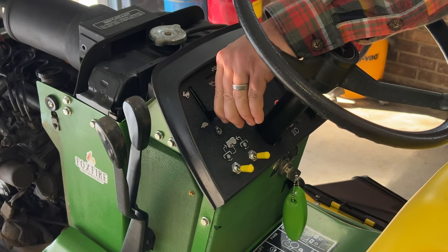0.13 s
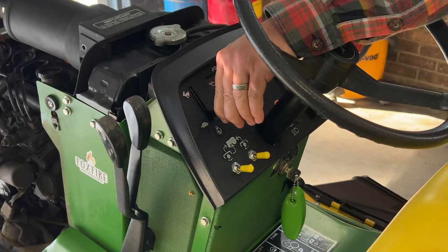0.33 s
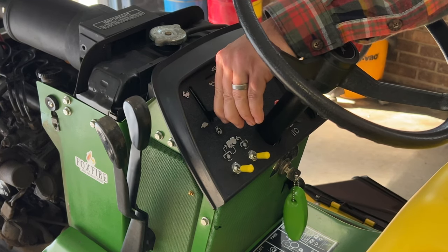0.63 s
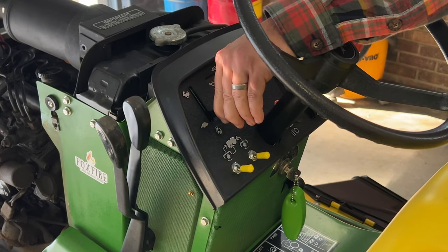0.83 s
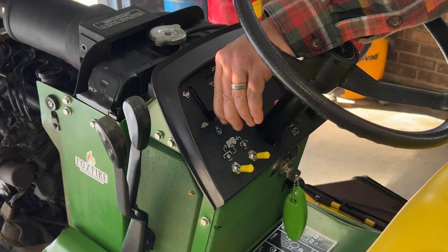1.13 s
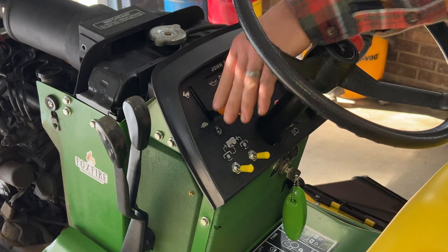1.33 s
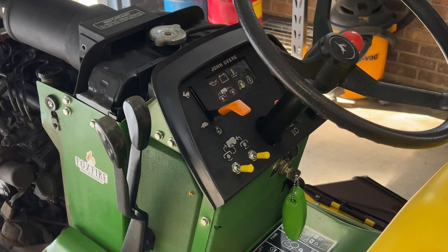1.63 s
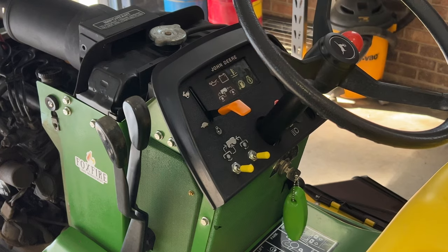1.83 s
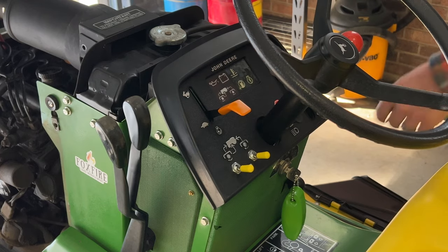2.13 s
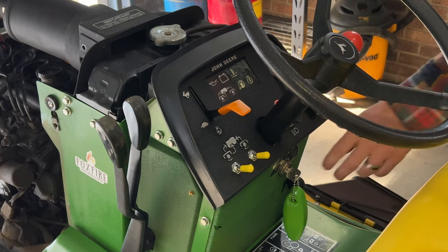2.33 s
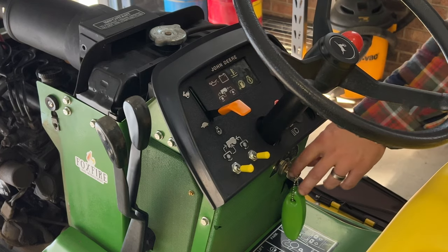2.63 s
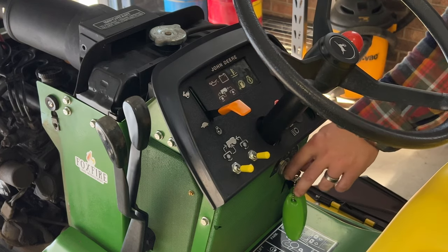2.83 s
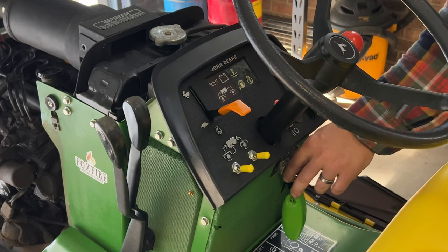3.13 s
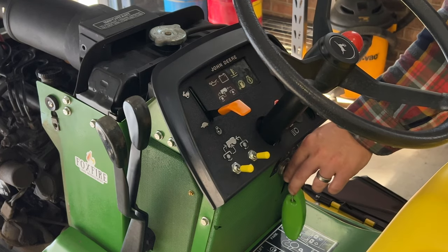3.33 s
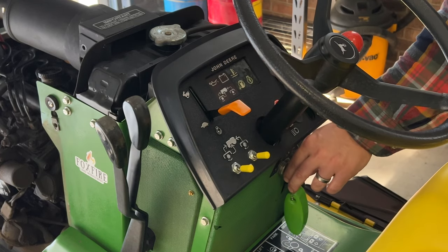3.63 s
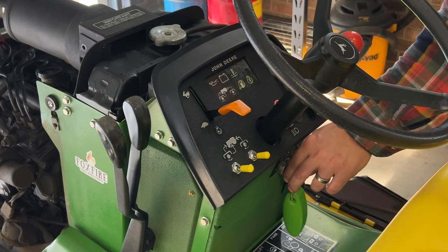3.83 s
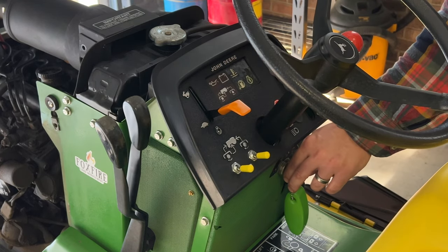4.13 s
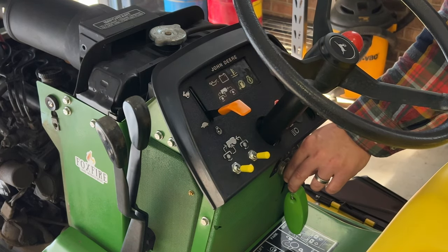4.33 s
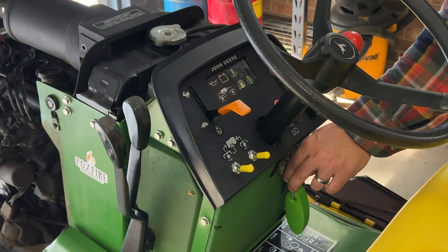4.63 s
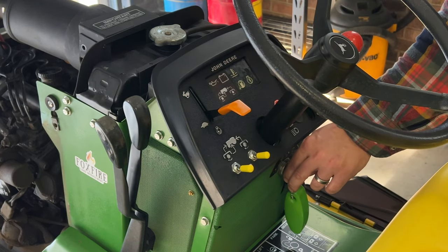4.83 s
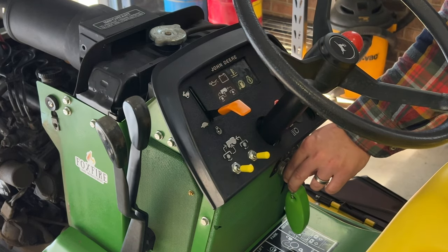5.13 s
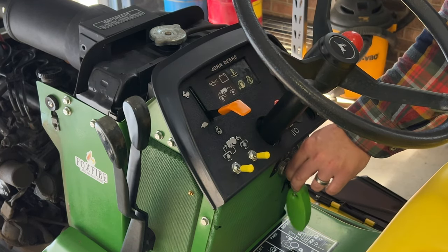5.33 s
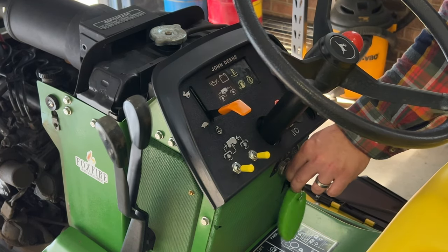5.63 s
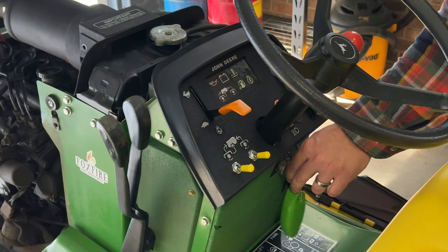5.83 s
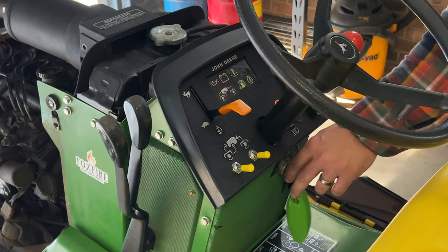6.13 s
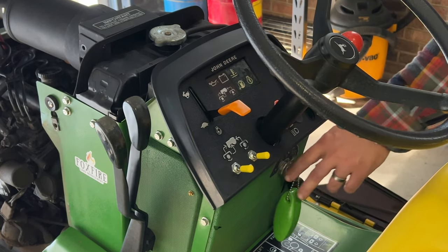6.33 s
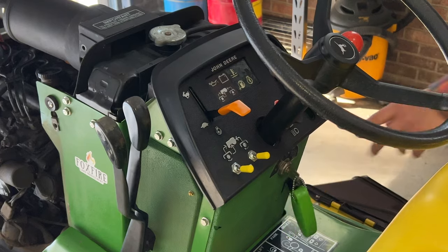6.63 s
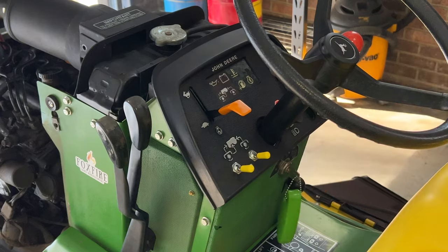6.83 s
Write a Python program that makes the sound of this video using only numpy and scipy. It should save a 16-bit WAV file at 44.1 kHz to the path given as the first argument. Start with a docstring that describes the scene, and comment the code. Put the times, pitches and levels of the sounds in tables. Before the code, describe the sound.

Inside a brick garage, a small tractor's three-cylinder diesel is already running at a steady fast idle, heard close up: low buzzing exhaust pulses, hard metallic knocks, rattling panels, ticking valves and a broad fan whirr. After about five and a half seconds it is shut off, shuddering down through slowing puffs and small key jingles to near silence.

```python
"""A brick garage: a three-cylinder diesel at fast idle, then the key cuts the fuel and it coasts to rest.
Each firing puffs through the silencer and feeds the garage's low standing waves; blows at fixed crank
angles knock the block, rattle the covers and tick in the valve gear and injectors. Filtered noise makes
the whirr, the shudder of the run-down and the hum; key ring ticks and a soft rustle come last.
The garage answers the metal with a noise tail."""
import sys
import numpy as np
from scipy import signal
from scipy.fft import rfft, irfft
from scipy.io import wavfile

SR = 44100
rng = np.random.default_rng(int(sys.argv[2]) if len(sys.argv) > 2 else 0)


def materialize(psi):
    """Save the field psi as 16-bit PCM at rate SR to the path in sys.argv[1].

    A 1-D psi becomes a single channel; in a 2-D psi each row is a channel.
    """
    bounded = np.clip(np.atleast_2d(psi).T, -1, 1)
    quanta = np.round(bounded * 32767).astype(np.int16)
    wavfile.write(sys.argv[1], SR, quanta)


def volts_from_decibels(level):
    """Turn decibel levels (scalar or array-like) into linear amplitude factors."""
    exponent = np.asarray(level, float) / 20
    return 10 ** exponent


N = 307818  # samples

# engine speed while fuelled: start_s, firings_per_s
SPEED = [(0, 32.7), (.15, 33.792), (.3, 33.765), (.6, 33.273), (1, 33.159), (1.5, 33.108), (2, 32.961),
         (3, 32.768), (4, 32.682), (5, 32.614), (5.45, 32.525), (5.53, 32.3)]
START_COUNT = -1.87  # firings counted at time zero; whole numbers are exhaust puffs
LEAD_S = 0.6  # the engine has already run this long at time zero
FUEL_CUT_S, FADE_S = 5.53, 0.069
# running noise as the crank slows, first value held until then: start_s, level_db
RUN_DOWN = [(5.5, -3.5), (5.7, -5), (5.9, -5.5), (6.05, -7), (6.15, -15.5), (6.25, -24.5), (6.3, -19),
            (6.45, -33), (6.6, -40), (6.8, -66)]
TREBLE_HZ, TREBLE_STEEPER = 3500, 1.4  # whirr above this follows the run-down dB times 1.4
VALVES_EASE = -0.1  # share of the run-down dB that the valve gear is spared

# exhaust puffs while coasting, one a cylinder, the last two as the crank rocks:
# start_s, level_db (against a fuelled puff)
COAST = [(5.56, 0.5), (5.593, -0.5), (5.630, -3.5), (5.673, -5.5), (5.719, -7), (5.768, -6.5),
         (5.829, -15.5), (5.909, -11.5), (6.025, -12), (6.212, -11), (6.351, -15.5)]
# unequal manifold branches, one row a cylinder: level_db, late_ms, edge_db (against the puff's body)
CYLINDERS = [(-0.35, 0.16, 3), (0, 0.28, -6), (0.5, -0.037, -9)]
# colour of one puff leaving the silencer: pitch_hz, relative_db
SILENCER = [(15, -43.5), (33, -27.5), (48, -32), (66, -17), (98, -8.5), (131, 2.6), (164, 0), (197, -8),
            (230, -8.5), (262, -7), (295, -8.5), (330, -16), (400, -16.5), (460, -24.5), (1500, -51.5)]
# standing waves between the walls: pitch_hz, width_hz, gain_db
STANDING_WAVES = [(64.6, 57, -2), (130.47, 4.15, 3), (262, 9.9, 0.5)]
# late copies of the puffs' edges off the walls: late_ms, level_db
WALL_ECHOES = [(23, -4.5), (47, -3.5)]
ECHO_ABOVE_HZ = 353
PUFF_DB, PUFF_SCATTER_DB = -19, 0.25
EDGE_HZ = 178  # above this a puff is its sharp leading edge
COAST_EDGE_DB, EDGE_LOSS_DB = 1.5, -0.5  # edge of the first coasting puff, change with each later one

# blows in each three-firing cycle: place_firings (after the cycle's first puff), relative_db;
# the covers and the panel have fuelled_db, unfuelled_db instead
COVER_BLOWS = [(.3, -5.5, -18.5), (.68, -6, -6.5), (1.05, 1, -1), (1.6, -4, -12), (2, 2.5, 1),
               (2.3, -9.5, -8), (2.79, -5.5, -4.5)]
PANEL_BLOWS = [(.85, 4, -3), (1.9, -7.5, 2.5), (2.7, 0.5, -15)]
BLOCK_BLOWS = [(.48, 3), (.66, 0), (1.1, -12), (1.45, 0), (1.62, -3), (2, -11), (2.48, -6), (2.66, -9)]
VALVE_BLOWS = [(.48, -7.5), (.62, 3), (.82, 1), (1.47, -4.5), (1.98, 4.5), (2.18, -7.5), (2.45, -1),
               (2.83, -2.5)]
INJECTOR_TICKS = [(.46, 0), (1.46, -8), (2, 3), (2.45, -3.5), (2.85, -5)]
# resonances of sheet covers, one large panel and the block: pitch_hz, width_hz, gain_db
COVERS = [(368, 54, -7.5), (552, 37, -15), (607, 27, -7.5), (664, 86, 2), (813, 127, -2), (970, 110, -0.5),
          (1085, 53, -4), (1260, 120, -24)]
PANEL = [(685, 27, 0)]
BLOCK = [(1930, 43, -7.5), (2133, 75, 6), (2500, 340, -2), (2693, 57, -2.5), (2882, 184, 3), (3210, 80, 0),
         (3430, 1100, -17)]
# noise colours of valve gear and injectors: pitch_hz, relative_db (per Hz)
VALVES = [(2500, -25), (3800, 2.5), (5500, -3.5), (7000, -4.5), (8900, -3.5), (10300, -16), (12000, -21),
          (13500, -23.5), (15600, -16)]
INJECTORS = [(7000, -45.5), (10000, -13), (12000, -5), (14000, -3.5), (15600, -9)]
# the block's regular knock swells and eases: start_s, level_db
BLOCK_DB = [(0, -30.5), (1.2, -32), (2.2, -31), (3.2, -27), (4.2, -30), (5.5, -29.5)]
COVERS_DB, PANEL_DB, VALVES_DB, INJECTORS_DB = -27.5, -33.5, -40, -55.5
UNFUELLED_BLOCK_DB, UNFUELLED_VALVES_DB, UNFUELLED_INJECTORS_DB = -15.5, -9, -20  # added once unfuelled

# fan, belts and gears: pitch_hz, relative_db (per Hz)
WHIRR = [(20, -25), (50, -16), (110, -5), (200, -4), (300, -7), (450, -13), (680, -10), (1000, -8),
         (1450, -11), (2100, -11), (2850, -11), (4540, -19), (8900, -22), (10500, -31), (13600, -33),
         (15600, -38)]
# quiet garage: pitch_hz, relative_db (per Hz)
HUM = [(15, -59), (30, -24), (55, -8.5), (68, 0.5), (85, -15.5), (108, -1.5), (129, -2), (162, -10.5),
       (630, -29), (911, -29.5), (1650, -36), (9000, -61), (14500, -59.5)]
WHIRR_DB, HUM_DB = -25.5, -56
# how long the garage rings: pitch_hz, t60_s
GARAGE = [(250, 1), (1000, 0.99), (4000, 0.13), (12000, 0.04)]
GARAGE_DB = -8
COVERS_WET_DB = -3  # the covers face the listener, so less of them comes by way of the walls

# the hardest combustion knocks: start_s, blow_db (before the ringing)
KNOCKS = [(0.248, -13.5), (0.4263, -10), (0.7254, -6), (1.058, -10.5), (1.1467, -10), (1.2414, -15.5),
          (1.6934, -12.5), (1.7197, -6.5), (1.8736, -13), (2.086, -9.5), (2.147, -14), (2.51, -10),
          (2.6953, -12.5), (2.9076, -12.5), (3.0596, -11), (3.2448, -7.5), (3.4263, -10), (3.613, -8),
          (4.8336, -10), (5.079, -7), (5.345, -8.5)]
KNOCK_TREBLE_DB = -25  # against the blow
# key ring ticks and jolts as the key is turned: start_s, tick_db (before colouring), block_db (above that)
TICKS = [(5.345, -24.5, -17), (5.666, -47, -6), (5.680, -34, 4.5), (5.704, -30, 7), (5.751, -26.5, 7),
         (5.782, -24, -3), (5.798, -21, 8), (5.833, -27.5, -7), (5.880, -36.5, 5), (5.897, -54, 16),
         (5.92, -29.5, -7), (5.965, -29.5, -7), (6.002, -27.5, -3), (6.023, -27.5, -3), (6.098, -47, -2),
         (6.169, -52, 14), (6.264, -65.5, 34), (6.299, -59.5, 0), (6.360, -63.5, 0), (6.392, -69, 0)]
# key ring colour: pitch_hz, relative_db (per Hz)
KEY_RING = [(3000, -23), (5500, -3), (7300, -2), (9200, -1), (10500, -16.5), (12500, -14.5), (14500, -18),
            (15600, -20)]
# shaking on the mounts: pitch_hz, relative_db (per Hz)
MOUNTS = [(15, -26), (40, -19), (70, -9.5), (130, 1), (200, -1), (350, -9), (480, -12), (800, -11),
          (1300, -14.5), (3000, -60)]
SHUDDER_DB = -27
LURCH, LURCH_S = 1.5, 0.025  # extra gain at each compression, decay
# a soft bump and rustle as the hand leaves the key: start_s, scuff_db (before colouring)
RUSTLE = [(6.896, -51), (6.912, -64), (6.930, -57), (6.948, -58), (6.964, -58)]
# hand colour: pitch_hz, relative_db (per Hz)
HAND = [(80, -24), (250, 14), (600, -6), (1200, -10), (2000, -15), (5000, -29), (12000, -48)]


def evened(x):
    """Scales to rms 1."""
    return x / np.sqrt(np.mean(x ** 2) + 1e-20)


def curve(rows):
    """Joins (start_s, value, ..) rows by straight lines, one array a column."""
    s, *columns = np.transpose(rows)
    return [np.interp(np.arange(N) / SR, s, c) for c in columns]


def read(points, hz):
    """Reads a spectrum on a log-frequency axis."""
    f, value = np.transpose(points)
    return np.interp(np.log(hz + 1), np.log(f + 1), value)


def colour(x, points, size=16384):
    """Causal filter with the given spectrum (folded cepstrum), energy 1."""
    db = np.maximum(read(points, np.fft.rfftfreq(size, 1 / SR)), -100)
    cepstrum = irfft(db * np.log(10) / 20)
    cepstrum[1:size // 2] *= 2
    cepstrum[size // 2 + 1:] = 0
    taps = irfft(np.exp(rfft(cepstrum)))[:size // 2]
    return signal.oaconvolve(x, taps / np.linalg.norm(taps))[:len(x)]


def highpass(x, order, hz):
    """Butterworth filter that removes the sound below hz."""
    return signal.sosfilt(signal.butter(order, hz, "high", fs=SR, output="sos"), x)


def ring(x, modes, start=1):
    """Sums resonances of the given gain at their centres; start -1j begins from rest, as a struck part does."""
    out = np.zeros(len(x))
    for hz, width, db in modes:
        pole = np.exp((2j * hz - abs(width)) * np.pi / SR)
        resonance = signal.lfilter([1 - abs(pole)], [1, -pole], x)
        out += volts_from_decibels(db) * 2 * (start * resonance).real
    return out


def struck(x, modes):
    """Blows ring the modes; a stiff part radiates little below its lowest mode."""
    return highpass(ring(x, modes, -1j), 2, 0.8 * modes[0][0])


def clicks(s, size, count=N):
    """One impulse at each time."""
    at = np.round(np.asarray(s) * SR).astype(int)
    inside = (at >= 0) & (at < count)
    return np.bincount(at[inside], size[inside], count)


def bursts(s, size, decay_ms):
    """Noise that starts at each time and dies away, peak envelope = size."""
    fall = np.exp(-1000 / (SR * abs(decay_ms)))
    power = signal.lfilter([1], [1, -fall ** 2], clicks(s, size ** 2))
    return np.sqrt(power) * rng.standard_normal(N)


def crank(firings):
    """Times at which the crank reaches the given firing counts, and the count of the first coasting puff."""
    fuelled = round(SPEED[-1][0] * SR)
    count = START_COUNT + np.cumsum(curve(SPEED)[0][:fuelled]) / SR
    coasting = np.ceil(count[-1]) + np.arange(len(COAST))
    s = np.r_[-LEAD_S, np.arange(fuelled) / SR, np.transpose(COAST)[0]]
    counts = np.r_[START_COUNT - LEAD_S * SPEED[0][1], count, coasting]
    return np.interp(firings, counts, s, right=-1), int(coasting[0])


def unfuelled():
    """0 while the engine fires, rising to 1 after the fuel cut."""
    return np.clip((np.arange(N) / SR - FUEL_CUT_S) / FADE_S, 0, 1)


def blows(table, scatter_db, jitter):
    """Times and sizes of one part's blows in every cycle; the last column holds after the fuel cut."""
    place, *db = np.transpose(table)
    cycles = np.arange(-3, crank(0)[1] + len(COAST), 3)[:, None]
    late, strong = rng.standard_normal((len(cycles), len(table), 2)).transpose(2, 0, 1)
    s = crank((cycles + place + jitter * late).ravel())[0].reshape(late.shape)  # jitter in firings
    level_db = np.where(s < FUEL_CUT_S, db[0], db[-1]) + scatter_db * strong
    return s.ravel(), volts_from_decibels(level_db).ravel()


def echoes(x):
    """Late copies of the upper part of a sound, thrown back by the walls."""
    ms, db = np.transpose(WALL_ECHOES)
    upper = highpass(x, 4, ECHO_ABOVE_HZ)
    return signal.oaconvolve(upper, clicks(ms / 1000, volts_from_decibels(db), count=4096))[:len(x)]


def exhaust():
    """A pressure puff for each firing passes the silencer, then excites standing waves and wall echoes."""
    firing = np.arange(-18, crank(0)[1] + len(COAST))
    db, late_ms, edge_db = np.array(CYLINDERS)[firing % 3].T
    db[-len(COAST):] += np.transpose(COAST)[1]
    edge_db[-len(COAST):] += COAST_EDGE_DB + EDGE_LOSS_DB * np.arange(len(COAST))
    db += PUFF_SCATTER_DB * rng.standard_normal(len(firing))
    s = LEAD_S + crank(firing)[0] + late_ms / 1000
    lead = round(LEAD_S * SR)
    body = clicks(s, volts_from_decibels(db), count=N + lead)
    edge = clicks(s, volts_from_decibels(db + edge_db), count=N + lead)
    # the body below EDGE_HZ, the edge above it
    keep = np.exp(-2 * np.pi * EDGE_HZ / SR)
    pulses = edge + signal.lfilter([1 - keep], [1, -keep], body - edge)
    puffs = colour(pulses, SILENCER) * volts_from_decibels(PUFF_DB) * np.sqrt(SR / SPEED[0][1])
    return (puffs + ring(puffs, STANDING_WAVES) + echoes(puffs))[lead:]


def covers():
    """Sheet covers ring from nearly the same blows in every cycle; one large panel swells and hums."""
    rung = struck(clicks(*blows(COVER_BLOWS, 1.5, 0.0015)), COVERS)
    # ringing twice gives the panel its swell
    panel = ring(ring(clicks(*blows(PANEL_BLOWS, 1, 0.001)), PANEL), PANEL)
    return volts_from_decibels(curve(RUN_DOWN)[0]) * (volts_from_decibels(COVERS_DB) * evened(rung) + volts_from_decibels(PANEL_DB) * evened(panel))


def clatter():
    """Noisy blows at fixed crank angles ring the block, the valve gear and the injectors."""
    block = struck(bursts(*blows(BLOCK_BLOWS, 2.5, 0.01), 5), BLOCK)
    valves = colour(bursts(*blows(VALVE_BLOWS, 2.5, 0.004), 3.5), VALVES)
    injectors = colour(bursts(*blows(INJECTOR_TICKS, 1.5, 0.004), 1.8), INJECTORS)
    run_down_db, cut = curve(RUN_DOWN)[0], unfuelled()
    block_db = curve(BLOCK_DB)[0] + UNFUELLED_BLOCK_DB * cut
    valves_db = VALVES_DB + UNFUELLED_VALVES_DB * cut + VALVES_EASE * run_down_db
    injectors_db = INJECTORS_DB + UNFUELLED_INJECTORS_DB * cut
    mix = volts_from_decibels(block_db) * evened(block) + volts_from_decibels(valves_db) * evened(valves)
    return volts_from_decibels(run_down_db) * (mix + volts_from_decibels(injectors_db) * evened(injectors))


def whirr():
    """Broad noise of fan, belts and gears that sinks and dulls as the crank slows."""
    noise = colour(rng.standard_normal(N), WHIRR)
    db = curve(RUN_DOWN)[0]
    low = signal.lfilter(*signal.butter(1, TREBLE_HZ, fs=SR), noise)
    return volts_from_decibels(WHIRR_DB) * (volts_from_decibels(db) * low + volts_from_decibels(TREBLE_STEEPER * db) * (noise - low))


def hum():
    """The low background of the quiet garage, as coloured noise."""
    return volts_from_decibels(HUM_DB) * colour(rng.standard_normal(N), HUM)


def garage(x):
    """Reverberation as a noise tail, each band dying at its own speed."""
    hz, t, z = signal.stft(rng.standard_normal(SR), SR, nperseg=256)
    decay = volts_from_decibels(-60 * t / read(GARAGE, hz)[:, None])
    tail = signal.istft(z * decay, SR, nperseg=256)[1]
    # builds up over the first 12 ms of reflections
    tail = tail * np.minimum(np.arange(len(tail)) / (0.012 * SR), 1)
    return signal.oaconvolve(x, tail / np.linalg.norm(tail))[:N]


def knocks():
    """Single hard combustion blows ring the block, with a little treble."""
    s, db = np.transpose(KNOCKS)
    treble = colour(bursts(s, volts_from_decibels(db + KNOCK_TREBLE_DB), 18), VALVES)
    return struck(bursts(s, volts_from_decibels(db), 9.1), BLOCK) + treble


def ticks():
    """The key ring ticks against the shaking panel; some jolts also sound in the block."""
    s, db, block_db = np.transpose(TICKS)
    jolts = struck(bursts(s, volts_from_decibels(db + block_db), 7), BLOCK)
    return jolts + colour(bursts(s, volts_from_decibels(db), 4), KEY_RING)


def shudder():
    """Low noise once the engine no longer fires; each compression shakes the mounts."""
    s = np.transpose(COAST)[0]
    fall = np.exp(-1 / (LURCH_S * SR))
    lurch = 1 + LURCH * signal.lfilter([1], [1, -fall], clicks(s, np.ones(len(s))))
    level = volts_from_decibels(SHUDDER_DB + curve(RUN_DOWN)[0])
    return lurch * unfuelled() * level * colour(rng.standard_normal(N), MOUNTS)


def rustle():
    """Short dull scuffs of the hand, as dying noise bursts."""
    s, db = np.transpose(RUSTLE)
    return colour(bursts(s, volts_from_decibels(db), 7.3), HAND)


def scene():
    """Sums the engine, the key, the hand and the garage."""
    metal = clatter() + knocks() + ticks() + rustle()
    sheet = covers()
    walls = volts_from_decibels(GARAGE_DB) * garage(metal + volts_from_decibels(COVERS_WET_DB) * sheet)
    return (exhaust() + metal + sheet + walls + whirr() + shudder() + hum())[None]


def low_pass(x):
    """Removes everything above the highest recorded frequency."""
    return signal.sosfilt(signal.butter(12, 15710, fs=SR, output="sos"), x)


def record(dry):
    """Hands on the finished mix."""
    return low_pass(dry)


dry = scene()
out = record(dry)
materialize(out)
```